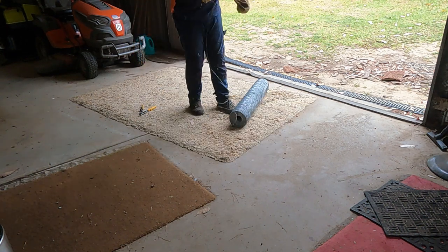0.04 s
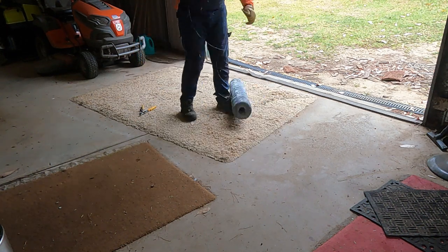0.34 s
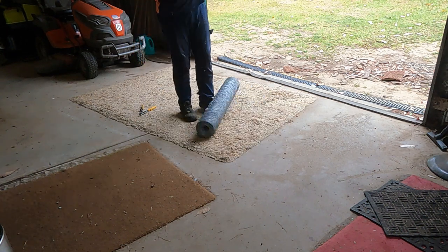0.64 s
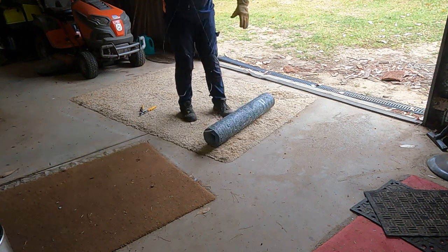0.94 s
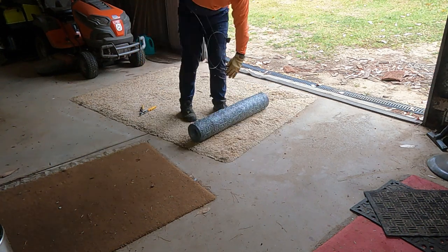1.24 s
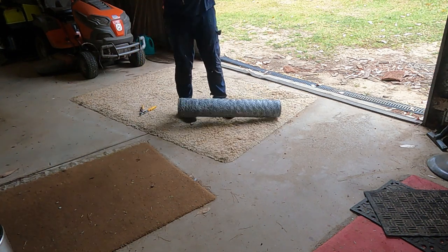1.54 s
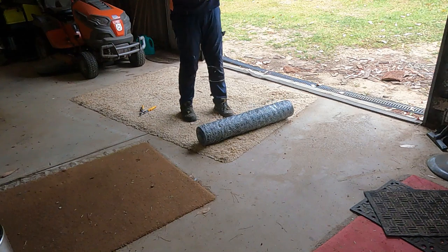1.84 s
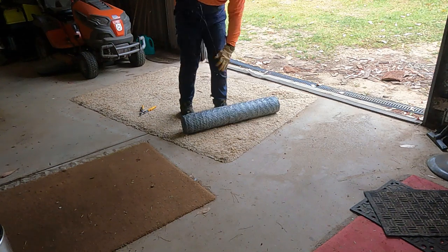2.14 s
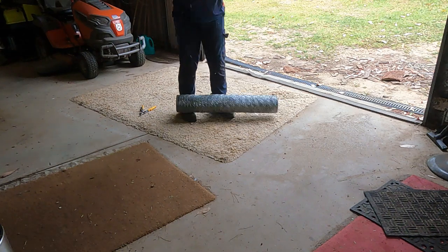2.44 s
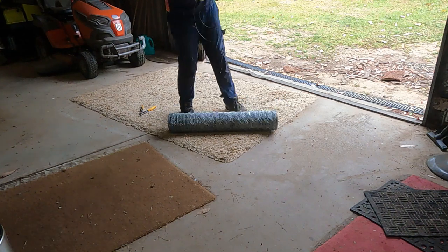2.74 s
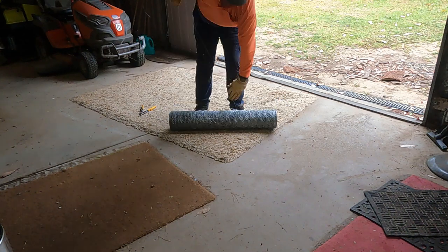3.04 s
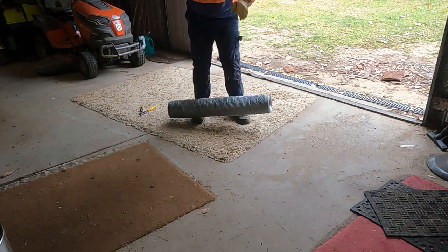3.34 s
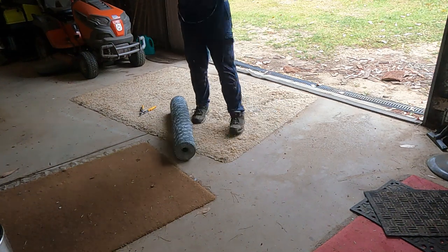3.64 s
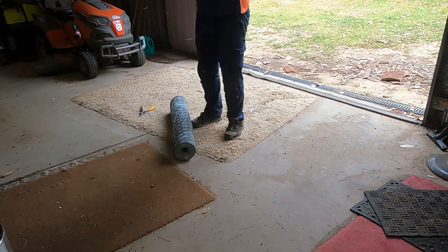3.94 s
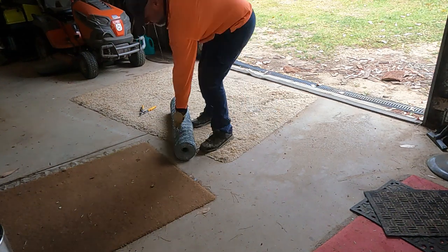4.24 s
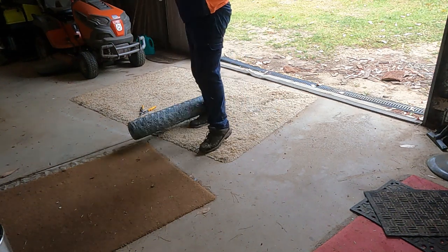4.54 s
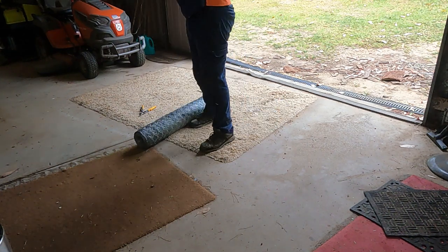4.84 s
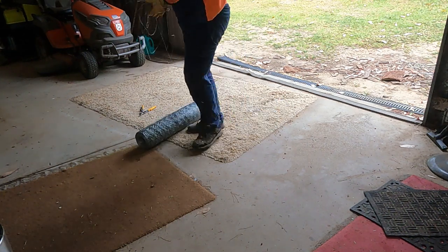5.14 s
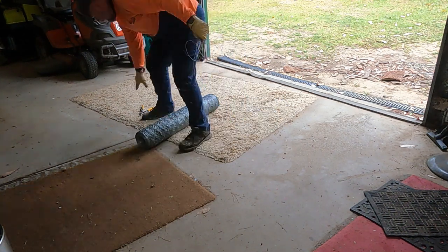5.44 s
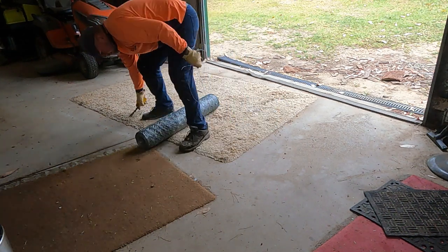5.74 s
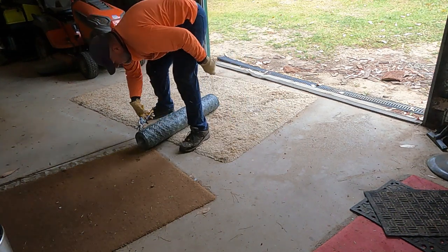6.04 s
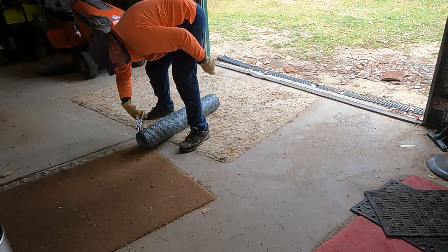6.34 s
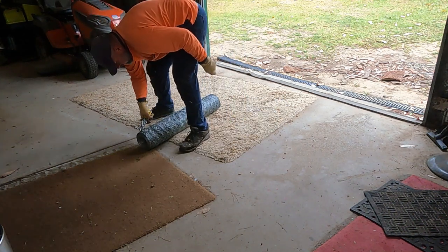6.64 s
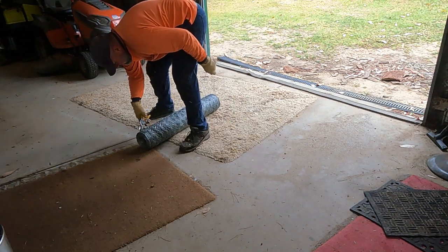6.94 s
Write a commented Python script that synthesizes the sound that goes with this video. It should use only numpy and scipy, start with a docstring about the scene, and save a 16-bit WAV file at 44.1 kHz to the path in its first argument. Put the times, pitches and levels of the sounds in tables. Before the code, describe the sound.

A roll of wire mesh is handled on a mat in a shed, over a quiet outdoor background. Clothes rustle and boots scuff with soft, low bumps. Around 0.4 seconds the mesh crackles, rasps and briefly squeaks, followed by a scrape. More shoves come at about 1.4 and 2.4 seconds, with sharp ticks as snagged wires spring free. A thin, very high trill runs from 2.2 to 3.1 seconds. At 3.3 seconds the mesh rattles again, and the roll lands with a quick cluster of hollow thuds near 3.6. Another crackle and lighter thuds follow from 4.5 to 4.8 seconds. Clothes swish and boots shuffle until about 6 seconds, with a few faint, high chirps near the end of that. The movement settles, and at 6.8 seconds cutters snip a wire with one loud, sharp crack and a brief metallic ring, slightly left.

```python
"""In a shed, a roll of chicken wire is nudged, rolled and dropped on a mat; then its tie wire is snipped.
Stick-slip friction makes the mesh crackle, rasp and squeak with each shove, and snagged wires spring
free. Each landing is an impact that sets the hollow roll humming. Boots scuff and clothes rustle until
the handler stands still for the cut, a hard crack that rings the steel jaws. A thin, high trill and
faint chirps sound over a quiet outdoor background."""
import sys
import numpy as np
from scipy import signal
from scipy.fft import rfft, irfft
from scipy.io import wavfile
from scipy.ndimage import uniform_filter1d

SR = 44100
rng = np.random.default_rng(int(sys.argv[2]) if len(sys.argv) > 2 else 0)


def output_pcm(signal):
    """Save a mono or channel-first signal as 16-bit PCM at the path in sys.argv[1].

    Samples are clipped to [-1, 1] before scaling.
    """
    pcm = np.clip(np.atleast_2d(signal).T, -1, 1) * 32767
    wavfile.write(sys.argv[1], SR, np.round(pcm).astype(np.int16))


N = 308343
TIME = np.arange(N) / SR
BAND_LIMIT_HZ = 16150

# spectrum of the whole roll rasping: f/Hz, level/dB
ROLL_SPECTRUM = [(150, -28), (300, -7), (440, -11.5), (600, 0), (850, -2.5), (1100, -3.5), (1400, -1),
                 (2300, -4.5), (3000, -7), (5000, -25)]
# the handler's movement: t/s, level of clothes/dB, level of boots on the mat/dB
MOVEMENT = [(0, -69.5, -67), (.15, -57.5, -66), (.33, -76, -57), (.8, -58, -67.5), (.92, -61.5, -56),
            (1.25, -61.5, -61), (1.85, -61, -57), (2.3, -58.5, -59), (3.18, -63, -63), (3.8, -58.5, -61),
            (4.1, -56.5, -68), (4.4, -60.5, -53), (4.8, -55.5, -59.5), (5.3, -58.5, -52.5),
            (6.17, -58, -62.5), (6.21, -66.5, -62), (6.7, -84, -60.5)]


def amp(db):
    """Amplitude ratio of a level in decibels."""
    return 10 ** (np.asarray(db) / 20)


def unit(x):
    """Normalisation to rms 1."""
    return x / np.sqrt(np.mean(x ** 2) + 1e-20)


def spectrum_gain(spectrum, hz):
    """Magnitude response, interpolated in decibels over log frequency."""
    f, db = np.transpose(spectrum)
    return amp(np.interp(np.log(hz + 1), np.log(f), db))


def add(mix, s, sound):
    """Superposition of a sound from time s on."""
    part = mix[max(round(s * SR), 0):][:len(sound)]
    part += sound[:len(part)]


def tint(x, spectrum, size=4096):
    """Minimum-phase filter of the given spectral shape; it conserves the power of white input."""
    log_gain = np.log(spectrum_gain(spectrum, abs(np.fft.fftfreq(size, 1 / SR))))
    taps = np.fft.ifft(np.exp(np.conj(signal.hilbert(log_gain)))).real[:size // 2]
    return signal.oaconvolve(x, taps / np.linalg.norm(taps))[:len(x)]


def decay(t, t60):
    """Exponential damping from t = 0, by 60 dB in t60 seconds."""
    return np.exp(-np.log(1000) * np.maximum(t, 0) / max(t60, 1e-3))


def grains(per_s, spread_db, size=N):
    """Shot noise: random impulses, most small and a few large."""
    strength = amp(spread_db * np.minimum(rng.exponential(1, size), 4))
    return unit(strength * rng.choice([-1, 1], size) * (rng.random(size) < per_s / SR))


def steady(x, size=1500):
    """Division by the running rms levels a texture and leaves its grain."""
    return x / np.sqrt(abs(uniform_filter1d(x ** 2, size)) + 1e-3)


def drift(size):
    """Low-pass noise of rms 1 that wanders over about size samples."""
    return unit(uniform_filter1d(uniform_filter1d(rng.standard_normal(N), size), size // 2))


def lurch(depth_db, size):
    """Stick-slip motion as a log-normal fluctuation of gain."""
    return unit(amp(depth_db * drift(size)))


def stroke(length, swell, arch):
    """Envelope of a rub: it rises for the share swell of its length; arch below 1 rounds it."""
    progress = np.arange(0, length, 1 / SR) / length
    return np.interp(progress, [0, np.clip(swell, .05, .95), 1], [0, 1, 0]) ** arch


def resonate(x, modes):
    """Second-order resonances raise or lower narrow bands."""
    return x + sum((amp(db) - 1) * signal.lfilter(*signal.iirpeak(hz, hz / width, fs=SR), x)
                   for hz, width, db in modes)


def shifting_contacts(x, depth_db, frames, bins):
    """Changing contact points make brief resonances: a random gain over time and frequency."""
    spectra = signal.stft(x, nperseg=512)[2]
    field = uniform_filter1d(rng.standard_normal(spectra.shape), bins, axis=0)
    field = uniform_filter1d(field, frames, axis=1)
    return signal.istft(spectra * unit(amp(depth_db * unit(field))), nperseg=512)[1][:N]


def movement_gain(column):
    """Amplitude envelope from one level column of the handler's movement."""
    rows = np.asarray(MOVEMENT)
    return amp(np.interp(TIME, rows[:, 0], rows[:, column]))


def shove_gain(column, attack_s=0.018):
    """Incoherent shoves add in power; each rises, holds while the roll slides, and dies away."""
    # t/s, duration/s, crackle level/dB, rasp level/dB, mat rumble level/dB
    shoves = [(0.384, 0.15, -48, -53.5, -74), (0.455, 0.015, -44.5, -69, -72),
              (0.536, 0.032, -38, -41, -55), (0.611, 0.15, -52.5, -51, -74),
              (1.395, 0.038, -51.5, -46.5, -58), (1.456, 0.044, -42, -42, -53),
              (1.507, 0.028, -55, -45.5, -66), (1.539, 0.064, -45.5, -45.5, -59),
              (1.613, 0.062, -56, -73, -75), (2.351, 0.071, -48.5, -54, -61),
              (2.455, 0.017, -41.5, -39.5, -49.5), (2.486, 0.071, -53.5, -50.5, -57.5),
              (2.564, 0.048, -39.5, -42.5, -53), (2.632, 0.041, -48.5, -50, -56),
              (3.335, 0.035, -46.5, -59, -79), (3.357, 0.1, -39.5, -45, -58),
              (3.478, 0.048, -40, -54.5, -58), (3.539, 0.031, -48, -47, -50),
              (4.478, 0.064, -47.5, -56, -74), (4.599, 0.15, -49.5, -57, -57)]
    power, t = np.zeros(N), TIME[:SR]
    for row in shoves:
        s, length = row[:2]
        envelope = np.minimum(t / attack_s, 1) * decay(t - length, t60=0.13)
        add(power, s, (amp(row[column]) * envelope) ** 2)
    return np.sqrt(power)


def shed(x, wet_db, t60, size=16000):
    """Reverberation: direct sound and a tail of scattered reflections, at unchanged total power."""
    t = TIME[:size]
    tail = grains(4000, 0.86, size) * decay(t, t60) * (t > .002)
    response = amp(wet_db) * tail / np.linalg.norm(tail)
    response[0] = 1
    return signal.oaconvolve(x, response / np.linalg.norm(response))[:N]


def side_reflections(mid, size=2500):
    """Shifting reflections reach the two microphones unequally and so form a side signal."""
    # stereo width in the shed: f/Hz, level of side relative to mid/dB
    width = [(40, -29), (130, -46), (330, -33), (450, -42), (700, -13), (1400, -17.5), (2200, -23),
             (2800, -14), (5500, -7), (8000, -8.5), (15000, -6.5)]
    scatter = grains(8000, 1, size) * decay(TIME[:size], t60=0.041)
    shifting = mid * unit(np.tanh(2 * drift(size=500)))
    reflected = signal.oaconvolve(shifting, scatter / np.linalg.norm(scatter))[:N]
    return irfft(rfft(reflected) * spectrum_gain(width, np.fft.rfftfreq(N, 1 / SR)), N)


def outdoors():
    """Ambient sound as stationary Gaussian noise, strongest at low frequencies."""
    # f/Hz, level/dB
    ambient_spectrum = [(25, -26.5), (60, -14), (100, -4.5), (160, -2), (280, -11.5), (450, -11.5),
                        (680, 0), (840, -2.5), (1050, -11), (1800, -17.5), (3500, -20), (4300, -15),
                        (7700, -20), (9800, -30.5), (12000, -38), (16000, -33)]
    return amp(-63) * tint(rng.standard_normal(N), ambient_spectrum)


def trill(pip_s=0.012, pitch_arch=0.035):
    """A train of tone bursts, each arched in frequency, quickens and sinks in pitch."""
    # t/s, f/Hz, level/dB, interval between pips/s
    course = [(2.225, 15520, -40, .085), (2.31, 15520, -40, .078), (2.45, 15350, -39.5, .0297),
              (2.7, 15070, -40, .0297), (3.085, 14930, -42, .0315)]
    # standard deviation from pip to pip: t/s, relative frequency, level/dB
    pip_scatter = (.0015, .005, 2.0)
    when, hz, db, interval = np.transpose(course)
    sound, arch = np.zeros(N), np.hanning(round(pip_s * SR))
    s = when[0]
    while s < when[-1]:
        late, sharp, louder_db = rng.standard_normal(3) * pip_scatter
        pitch = np.interp(s, when, hz) * (1 + pitch_arch * (arch - .8)) * (1 + sharp)
        pip = arch * np.sin(2 * np.pi * np.cumsum(pitch) / SR)
        add(sound, s + late, amp(np.interp(s, when, db) + louder_db) * pip)
        s += max(np.interp(s, when, interval), pip_s)
    return sound


def chirps(flutter=0.064):
    """Steep downward sweeps, made hoarse by random frequency modulation."""
    # t/s, duration/s, start f/Hz, end f/Hz, relative level/dB
    sweeps = [(5.686, 0.019, 15500, 9900, -50.5), (5.909, 0.0098, 15800, 7540, -50.5),
              (5.967, 0.011, 15500, 6800, -51), (6.035, 0.0073, 16100, 10100, -50),
              (6.072, 0.018, 14500, 7900, -50.5), (6.614, 0.0097, 11500, 8300, -62)]
    sound = np.zeros(N)
    for s, length, start_hz, end_hz, db in sweeps:
        glide = 1 / np.linspace(1 / start_hz, 1 / end_hz, round(length * SR))
        pitch = glide * (1 + flutter * drift(size=12)[:len(glide)])
        tone = np.sin(2 * np.pi * np.cumsum(pitch) / SR)
        add(sound, s, amp(db + 4) * signal.windows.tukey(len(tone), .5) * tone)
    return sound


def clothes():
    """Friction noise of fabric swells as a leg or a sleeve swings past."""
    # t/s, duration/s, level/dB
    swishes = [(0.045, 0.063, -51.5), (0.951, 0.023, -55), (1.874, 0.039, -54.5), (1.963, 0.055, -58),
               (2.77, 0.05, -56), (3.022, 0.13, -61.5), (3.237, 0.095, -58.5), (4.048, 0.051, -55),
               (4.389, 0.082, -55), (4.888, 0.14, -55), (5.182, 0.08, -57.5), (5.279, 0.24, -51.5),
               (5.568, 0.13, -58)]
    # f/Hz, level/dB
    fabric_spectrum = [(400, -6.5), (700, -2.5), (1200, -3.5), (2000, -3.5), (3600, -4), (4200, 2.5),
                       (7000, 3), (11000, 1.5), (16000, -1)]
    rubbing = movement_gain(column=1)
    for s, length, db in swishes:
        add(rubbing, s, amp(db) * stroke(length, swell=0.35, arch=0.44))
    rubbing = uniform_filter1d(rubbing, size=900) * lurch(depth_db=2.2, size=900)
    return tint(steady(grains(3200, 1.9)), fabric_spectrum) * rubbing


def scuffs(rise=0.0603, jitter=0.0546):
    """A boot or the roll's end rubs the mat: periodic stick-slip, faster with the push, amid noise."""
    # t/s, duration/s, level/dB, share of the duration spent swelling, slip rate/Hz
    rubs = [(0.628, 0.175, -44, 0.6, 694), (2.878, 0.19, -44, 0.59, 4760),
            (3.672, 0.15, -46.5, 0.075, 2640)]
    # one spectrum for each rub: f/Hz, level/dB
    rub_spectra = [
        [(500, -24), (900, -1), (1400, 4.5), (2300, 5.5), (2900, -16), (5000, -24), (16000, -22)],
        [(3800, -22), (4600, -1), (5500, -3), (7500, -10.5), (10500, -1), (14000, -2.5), (16000, -21)],
        [(1000, -10.5), (2600, -9.5), (6800, -10), (8200, -1.5), (9200, -4.5), (10400, 0), (11200, -14),
         (16000, -21)],
    ]
    sound = np.zeros(N)
    for (s, length, db, swell, slip_hz), spectrum in zip(rubs, rub_spectra):
        push = stroke(length, swell, arch=0.72)
        size = len(push)
        rate = slip_hz * (1 + rise * (push - push.mean()) + jitter * drift(size=60)[:size])
        phase = 2 * np.pi * np.cumsum(rate) / SR
        ridges = sum(np.cos(k * phase) for k in range(1, int(BAND_LIMIT_HZ / slip_hz) + 1))
        envelope = push * lurch(depth_db=2.0, size=300)[:size]
        friction = unit(grains(12000, 2.2, size) + amp(-6.5) * unit(ridges))
        add(sound, s, amp(db) * tint(envelope * friction, spectrum))
    return shed(sound, wet_db=-8, t60=0.069)


def mat_rumble():
    """Sliding friction: boots and the roll drag over the mat in low, uneven lumps."""
    # f/Hz, level/dB
    mat_spectrum = [(25, -35), (60, -13), (100, -7), (150, -11.5), (210, -1), (300, 0.5), (370, -4.5),
                    (460, -10.5), (650, -7), (1000, -18), (2500, -46)]
    lumps = shed(tint(grains(300, 2.7), mat_spectrum), wet_db=-2.5, t60=0.21)
    rumble = shifting_contacts(steady(unit(lumps), size=6000), depth_db=3, frames=6, bins=2)
    drag = np.hypot(movement_gain(column=2), shove_gain(column=4))
    return rumble * lurch(depth_db=1.7, size=1500) * drag


def thuds(hollow_hz=294, low_cut_hz=130):
    """The mat cushions each impact to a smooth pulse; the hollow roll hums on and its layers shudder."""
    # the roll or a boot lands: t/s, level/dB, f/Hz, half the contact time/s
    landings = [(0.137, -45.5, 252, .008), (.893, -41.5, 290, 0.0026), (1.01, -47, 283, 0.0034),
                (1.607, -43, 169, 0.0037), (1.672, -42.5, 565, .006), (1.822, -39.5, 241, 0.0044),
                (2.748, -39, 288, .0035), (2.96, -42.5, 186, .005), (3.535, -28.5, 368, 0.0016),
                (3.5749, -22, 387, .003), (3.6242, -17, 285, .0022), (3.6583, -27, 293, 0.0031),
                (3.708, -38, 323, .005), (3.807, -43.5, 235, .011), (4.262, -42, 257, 0.00336),
                (4.378, -42, 320, 0.0061), (4.589, -32.5, 305, 0.0037), (4.655, -31.5, 292, 0.0025),
                (4.6863, -24.5, 280, 0.0018), (4.743, -38.5, 308, 0.0059), (5.105, -41, 160, 0.0036)]
    # layers shaking against each other: f/Hz, level/dB
    shudder_spectrum = [(30, -47), (120, -18.5), (230, 1.5), (350, 2), (470, -5.5), (600, 0), (900, -18),
                        (2000, -39.5)]
    blows, shudder, t = np.zeros(N), np.zeros(N), TIME[:SR // 4]
    centre = t[-1] / 2
    for s, db, hz, contact in landings:
        pulse = np.exp(-((t - centre) / contact) ** 2) * np.cos(2 * np.pi * hz * (t - centre))
        hum = np.minimum(t * hz, 1) * decay(t, t60=0.2) * np.cos(2 * np.pi * hollow_hz * t)
        add(blows, s - centre, -amp(db) * pulse)
        add(blows, s, -amp(db - 18) * hum)
        add(shudder, s - contact, amp(db - 15) * grains(1500, 0.41, len(t)) * decay(t, t60=0.22))
    blows = signal.sosfilt(signal.butter(2, low_cut_hz, "high", fs=SR, output="sos"), blows)
    return shed(blows, wet_db=-8, t60=0.22) + tint(shudder, shudder_spectrum)


def squeaks(relative_width=0.16):
    """Resonance: quick slips of one wire along another excite a short stretch in a narrow band."""
    # t/s, duration/s, f/Hz, level/dB
    scrapes = [(0.465, 0.044, 4270, -39.5), (0.508, 0.017, 4370, -45), (0.622, .024, 1850, -45),
               (0.665, 0.055, 844, -46), (3.485, 0.021, 3630, -37)]
    sound, edge = np.zeros(N), 1 + relative_width / 2
    for s, length, hz, db in scrapes:
        push = stroke(length, swell=0.33, arch=1)
        band = signal.butter(2, [hz / edge, hz * edge], "band", fs=SR, output="sos")
        ringing = signal.sosfilt(band, grains(5400, 0.73, len(push)))
        add(sound, s, amp(db) * push * unit(ringing))
    return sound


def catches(size=6000):
    """A snagged wire releases its elastic energy in a tick; its neighbours patter as they settle."""
    # t/s, level/dB, relative level of the roll's rasp/dB
    snags = [(0.042, -36.5, -42), (0.373, -35, -3.5), (0.477, -29, -29), (0.718, -26, -13),
             (1.1126, -38.5, -5), (1.3023, -37.5, -28), (1.332, -29.5, -33), (1.353, -29.5, -31),
             (1.435, -29.5, -21), (1.4571, -26, -16), (1.5461, -21.5, -7.5), (1.6574, -37, 0),
             (1.713, -36.5, -8.5), (1.769, -50, 9), (2.2267, -38.5, -8), (2.2779, -37.5, -13),
             (2.3507, -25, -28), (2.4642, -31.5, -0.5), (2.574, -27, -23), (2.607, -31, 8.5),
             (2.735, -36, -7), (3.2294, -39, -9.5), (3.3336, -32.5, -20), (3.3688, -23, -21),
             (3.444, -23, -21), (3.4752, -22.5, -40), (3.618, -32.5, -5), (3.8775, -35, -15),
             (4.444, -35, -13), (4.4698, -26.5, -13), (4.5646, -25.5, -23), (4.603, -28, -29),
             (4.6528, -26, -6), (4.674, -37.5, 8), (4.7308, -39, 11.5), (4.908, -38.5, -6)]
    # f/Hz, level/dB
    tick_spectrum = [(1500, -12.5), (3000, -2), (4500, 2.5), (7000, 1.0), (11000, -5.5), (16000, -8.5)]
    ticks, rasp = np.zeros(N), np.zeros(N)
    for s, db, rasp_db in snags:
        patter = grains(5000, 2.6, size) * decay(TIME[:size], t60=0.054) * amp(-8.5)
        patter[0] = amp(1.5)  # the release itself
        add(ticks, s + .0008, amp(db) * patter)
        add(rasp, s + .0008, amp(db + rasp_db) * patter)
    sound = amp(-0.5) * tint(ticks, tick_spectrum) + tint(rasp, ROLL_SPECTRUM)
    return shed(sound, wet_db=-4.5, t60=0.2)


def slips(per_s, low_hz, high_hz, t60, ring, wires=300, size=1200):
    """Wire crossings slip at random; each impulse rings a length of wire at its natural frequency."""
    t, clicks = TIME[:size], grains(per_s, spread_db=2.0)
    pings = np.sin(2 * np.pi * np.geomspace(low_hz, high_hz, wires)[:, None] * t) * decay(t, t60)
    pings *= ring / np.linalg.norm(pings, axis=1, keepdims=True)
    wire, sound = rng.integers(0, wires, N), np.pad(clicks, (0, size))
    for at in np.flatnonzero(clicks):
        sound[at:at + size] += clicks[at] * pings[wire[at]]
    return steady(sound[:N])


def mesh():
    """Stick-slip friction: with each shove the wires crackle and the layers of the roll rasp together."""
    # f/Hz, level/dB
    wire_spectrum = [(900, -28), (2200, 0), (3300, -5), (4300, 0.5), (6000, -1), (9000, -4), (12500, -5),
                     (16000, -7)]
    # loose wire ends ring along: f/Hz, bandwidth/Hz, gain/dB
    loose_end_modes = [(3710, 56, 7)]
    crackle = tint(slips(per_s=3000, low_hz=2970, high_hz=14170, t60=0.0072, ring=0.61), wire_spectrum)
    rasp = tint(slips(per_s=1700, low_hz=558, high_hz=2775, t60=0.037, ring=0.34), ROLL_SPECTRUM)
    sound = unit(crackle) * amp(1.7) * shove_gain(column=2)
    sound += unit(rasp) * amp(1.83) * shove_gain(column=3)
    sound = shifting_contacts(sound, depth_db=2, frames=3, bins=6) * lurch(depth_db=2.1, size=300)
    return shed(resonate(sound, loose_end_modes), wet_db=-4.5, t60=0.039)


def snip(size=10000):
    """Fracture of the wire is one impulse; the jaws ring in damped modes and the freed ends rattle."""
    # t/s, crack level/dB, rattle level/dB, rattle duration/s, rattle t60/s
    cut = (6.7627, -0.5, -28, 0.016, 0.097)
    # steel jaws ringing, and last a brief bright burst that thickens the crack: f/Hz, level/dB, t60/s
    snip_modes = [(598, -46.5, 0.11), (905, -41, 0.13), (1990, -40, 0.074), (9590, -40, 0.092),
                  (13920, -37, .09), (15200, -9, 0.0041)]
    # freed ends on the mesh, and the crack: f/Hz, level/dB
    rattle_spectrum = [(200, -11), (450, -20), (700, -5), (1400, -5.5), (3000, -9.5), (5000, -6.5),
                       (7000, -9.5), (9300, 4.5), (11800, -4.5), (14200, 0.5), (16000, -4)]
    crack_spectrum = [(500, -29), (5000, -7), (9000, -7), (13000, 1), (16000, 7.0)]
    s, crack_db, rattle_db, length, rattle_t60 = cut
    t, sound = TIME[:size], np.zeros(N)
    crack = amp(crack_db) * tint(signal.unit_impulse(size), crack_spectrum)
    collisions = grains(9000, 1.8, size) * decay(t - length, rattle_t60)
    rattle = amp(rattle_db) * tint(collisions, rattle_spectrum)
    ring = sum(amp(db) * decay(t, t60) * np.sin(2 * np.pi * hz * t) for hz, db, t60 in snip_modes)
    add(sound, s, crack + rattle + ring)
    return sound


def scene():
    """Mid-side stereo: the sources superpose near the centre; reflections and ambience give width."""
    # resonances of the shed: f/Hz, bandwidth/Hz, gain/dB
    room_modes = [(241, 17, 1.5), (353, 6.6, -0.5)]
    background, all_round = outdoors(), outdoors()
    cut = snip()
    roll = mesh() + catches() + squeaks() + thuds()
    handling = mat_rumble() + shed(clothes(), wet_db=-8, t60=0.069) + scuffs()
    chirping = shed(trill() + chirps(), wet_db=-6.5, t60=0.15)
    mid = resonate(background + chirping + handling + roll + cut, room_modes)
    side = side_reflections(mid) + amp(-12.5) * all_round
    side += (amp(0.5) - 1) * cut  # the cutters are held a little to the left
    return np.array([mid + side, mid - side])


def record(dry):
    """A linear-phase low-pass filter limits the bandwidth."""
    taps = signal.firwin(401, BAND_LIMIT_HZ, window=("kaiser", 8), fs=SR)
    return signal.oaconvolve(dry, taps[None], "same")


dry = scene()
out = record(dry)
output_pcm(out)
```